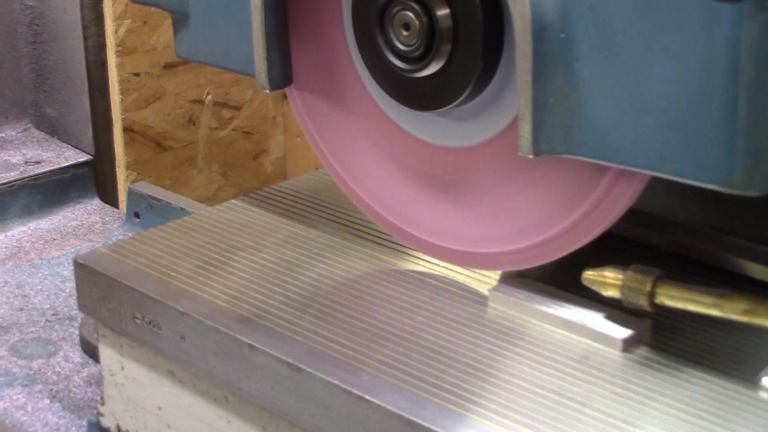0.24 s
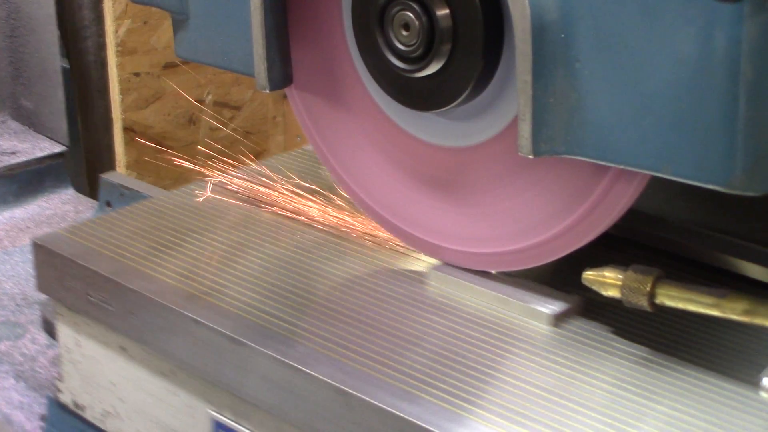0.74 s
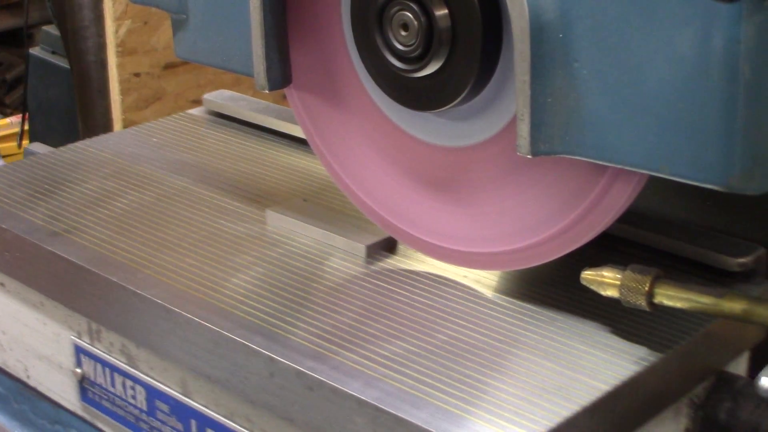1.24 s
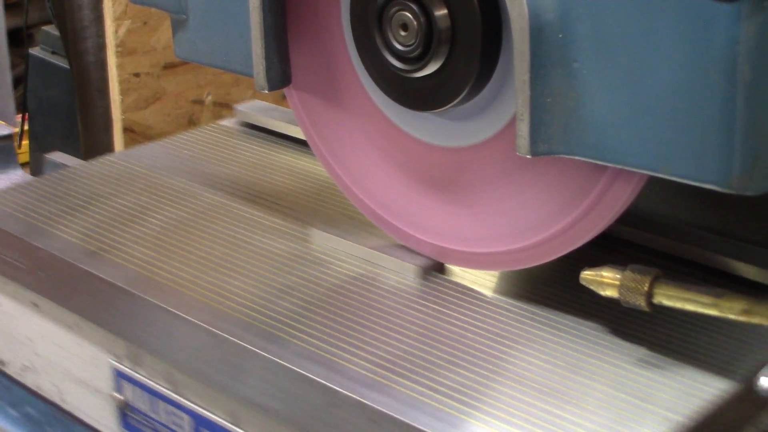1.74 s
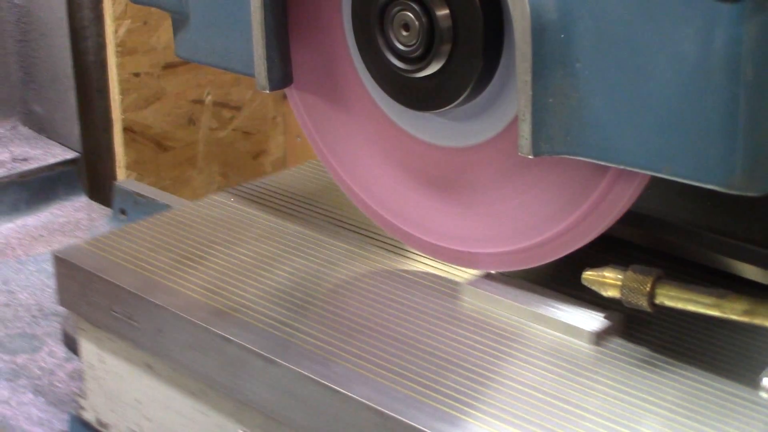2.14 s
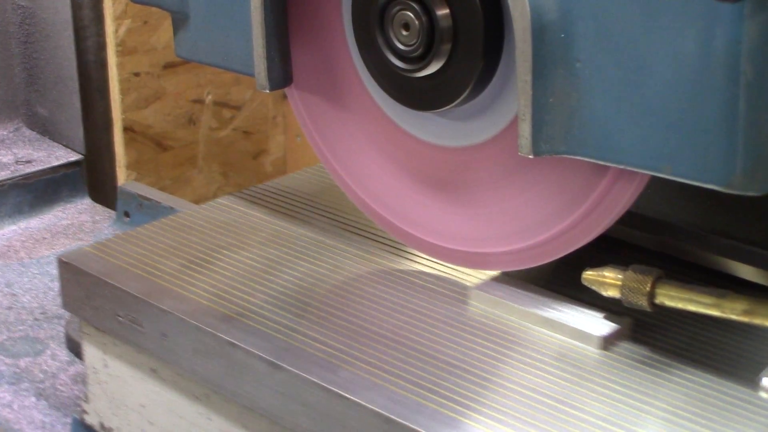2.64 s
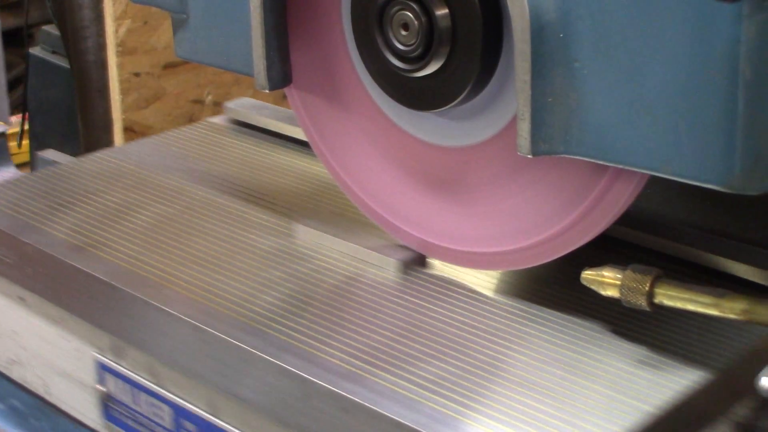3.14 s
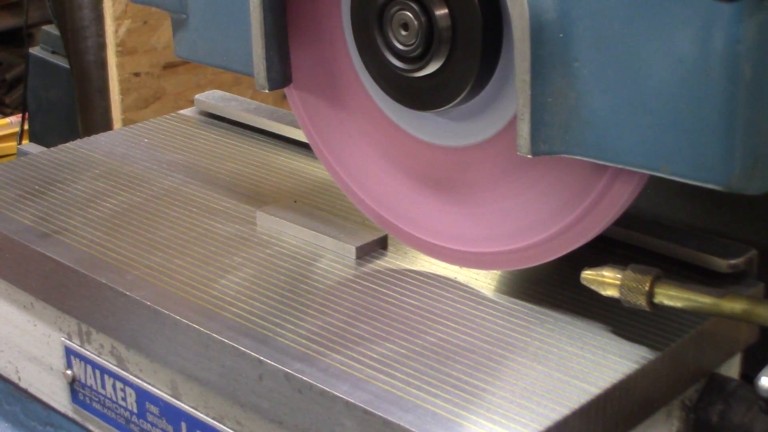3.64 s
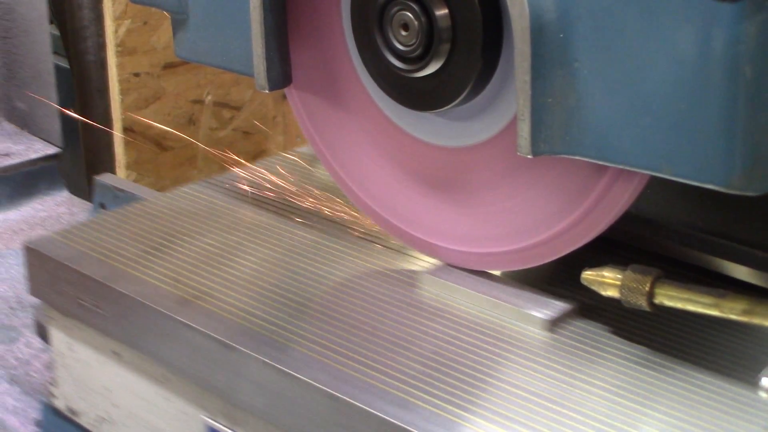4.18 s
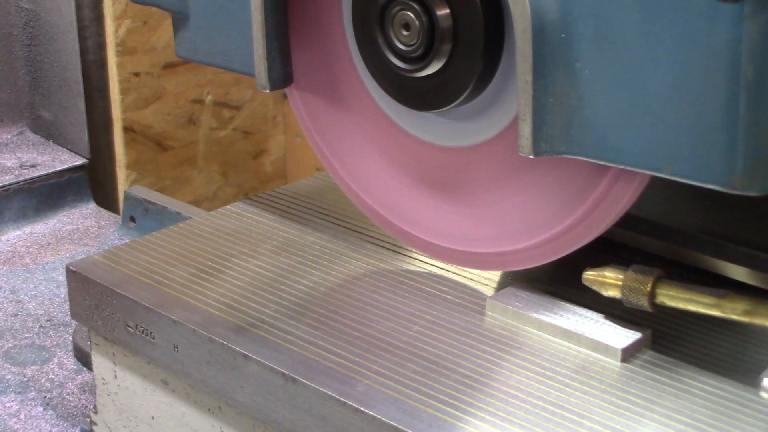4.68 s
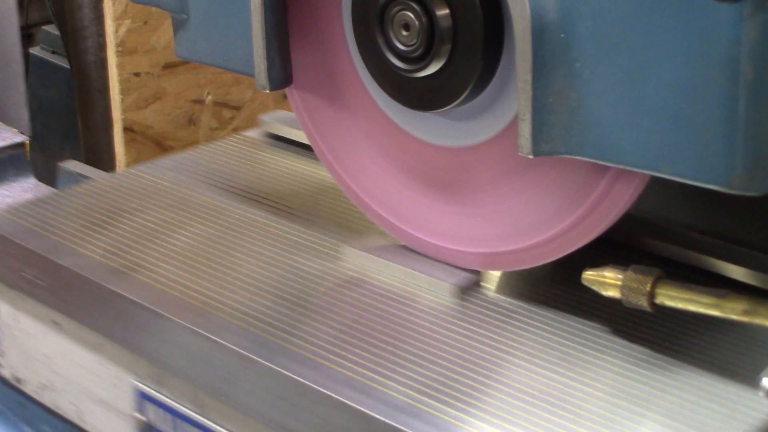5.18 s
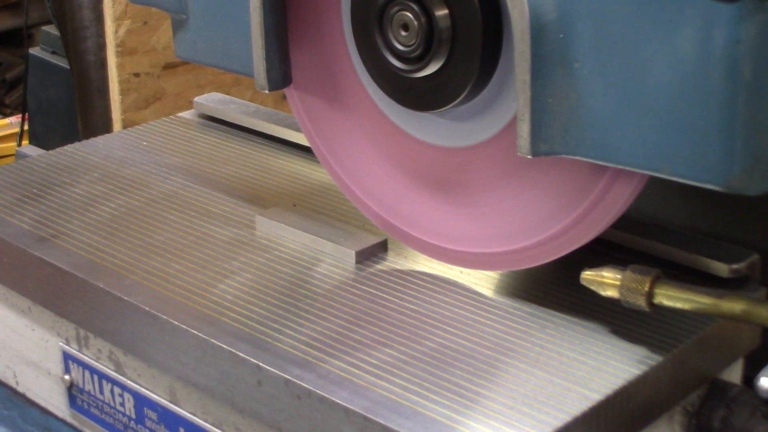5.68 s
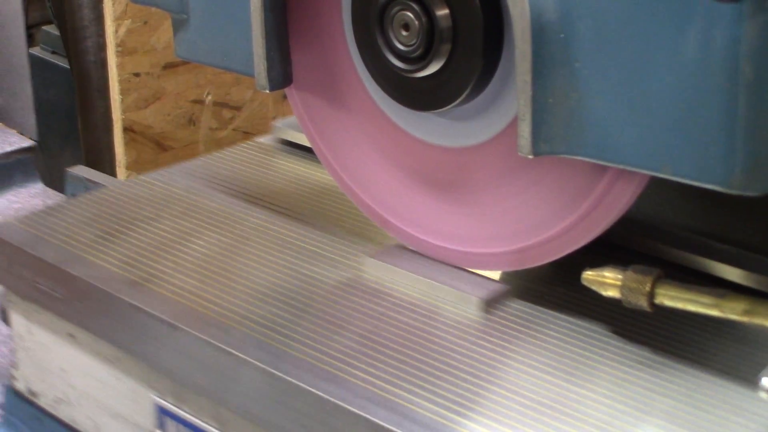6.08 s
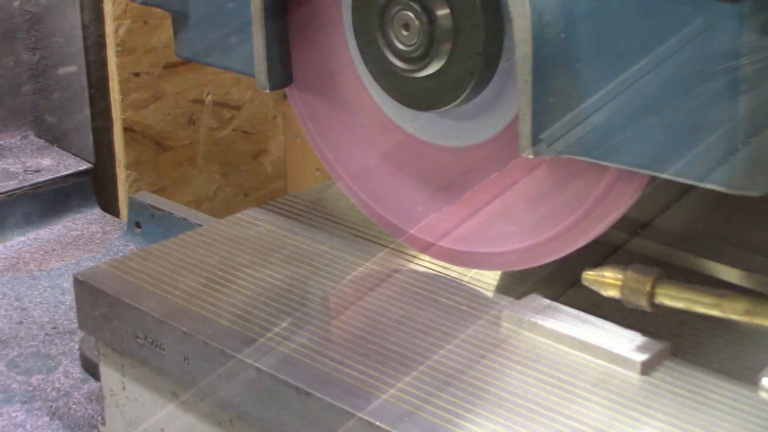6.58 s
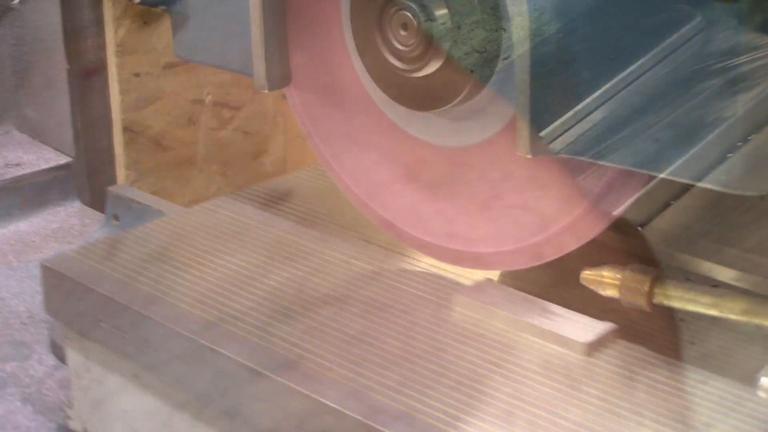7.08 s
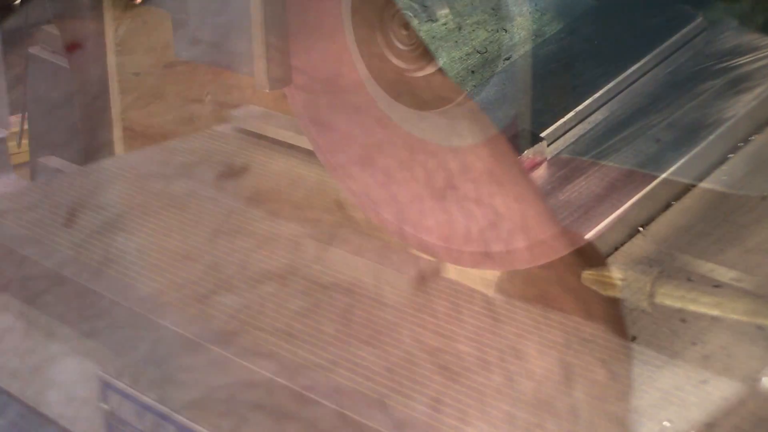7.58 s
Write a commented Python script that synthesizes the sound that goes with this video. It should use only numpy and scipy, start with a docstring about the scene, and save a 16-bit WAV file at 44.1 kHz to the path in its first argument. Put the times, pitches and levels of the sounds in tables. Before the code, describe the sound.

Close by a running grinding machine: constant buzzing mid-pitched whine over rushing air, short scratchy metallic zings on early passes growing fainter, sinking away at the end.

```python
"""In a machine shop, close by a surface grinder. Its drive whines near 408 Hz in a long harmonic series, each
harmonic a comb of sidebands spaced by the turn rate. The table slides to and fro, and interference with its
moving reflections makes the lines swell and cancel. Tones, hum, rushing air and a rumble lie underneath.
On each pass shaped noise hisses briefly as grit meets steel and the wheel's damped modes ring, mostly
weaker in the later passes as it sparks out. Everything sinks in level at the end."""
import sys
import numpy as np
from scipy import signal
from scipy.fft import rfft, irfft, next_fast_len
from scipy.io import wavfile
from scipy.ndimage import uniform_filter1d

SR = 44100
rng = np.random.default_rng(int(sys.argv[2]) if len(sys.argv) > 2 else 0)


def store_pcm(level_fs):
    """Save levels as 16-bit WAV."""
    pcm = np.round(np.clip(level_fs, -1, 1) * 32767).astype(np.int16)
    wavfile.write(sys.argv[1], SR, np.atleast_2d(pcm).T)


N = 344848
HOP = 16  # samples per step of the slow time grid
T = np.arange(N) / SR  # s
SLOW = np.arange(N // HOP + 2) * HOP / SR  # s
WHINE_HZ, TURN_HZ = 407.78, 25.8
SOUND_SPEED = 343  # m/s


def undb(db):
    """Logarithmic level: decibels to amplitude gain."""
    return 10 ** (np.asarray(db) / 20)


def unit(x):
    """Normalisation to a root-mean-square value of 1."""
    return x / np.sqrt(np.mean(np.abs(x) ** 2))


def curve(rows, t):
    """Linear interpolation between (time_s, value) rows."""
    return np.interp(t, *np.transpose(rows))


def colour(x, points):
    """Linear filtering: a spectrum of (frequency_hz, gain_db) points, joined on a logarithmic frequency axis."""
    size = next_fast_len(N)
    hz, db = np.transpose(points)
    f = np.maximum(np.arange(size // 2 + 1) * SR / size, 1)
    gain = undb(np.interp(np.log(f), np.log(hz), db))
    return irfft(rfft(x, size) * gain, size)[:N]


def walk(rate):
    """Low-pass random fluctuation: about `rate` fresh values a second, smoothed, with a spread near 1."""
    k = max(int(SR / HOP / rate), 1)
    held = rng.standard_normal(len(SLOW))[np.arange(len(SLOW)) // k]
    return 1.3 * uniform_filter1d(uniform_filter1d(held, k), k)


def rows_of(table, k, j):
    """Selection: the rows that belong to sideband j of harmonic k, without those two columns."""
    return [row[2:] for row in table if (round(row[0]), round(row[1])) == (k, j)]


# turning points of the table: time_s, position_m
TURNING_POINTS = [(-.6, 0.00048), (.38, 0.1503), (1.4, 0), (2.42, 0.1583), (3.5, 0.00023), (4.62, 0.1425),
                  (5.62, 0.0056), (6.65, 0.1437), (7.85, 0.001)]


def table_position():
    """Reciprocating motion: a half cosine eases the table from each turning point to the next (m)."""
    s, metres = np.transpose(TURNING_POINTS)
    stroke = np.interp(SLOW, s, np.arange(len(s)))
    eased = np.floor(stroke) + (1 - np.cos(np.pi * (stroke % 1))) / 2
    return np.interp(eased, np.arange(len(s)), metres)


def reflections(hz, position, share, count=3):
    """Multipath interference: the direct path plus echoes whose paths change by up to about twice the travel."""
    slope = rng.uniform(-1.98, 2.052, (count, 1))  # m of path per m of travel
    start = rng.random((count, 1))  # cycles
    turns = (hz * slope * position / SOUND_SPEED + start).astype(np.float32)
    echoes = np.cos(2 * np.pi * turns).sum(0) + 1j * np.sin(2 * np.pi * turns).sum(0)
    return unit(1 + share * echoes)


# lines with timed swells and dips: harmonic, sideband, start_swell_db, trend_db_per_s
TIMED_LINES = [(2, 0, 3, 0.01), (4, 0, 8.5, -1.32), (6, 1, 10, -0.49), (7, -1, 4.5, 0.04),
               (7, 1, 0.3, 0.83), (8, -1, -4.5, 0), (8, 1, -3.5, 0), (9, 1, -2, 0), (10, -1, -2, 0),
               (10, 1, -1.5, 0)]
# a node (-) or crest (+) of such a line's standing wave sweeps over the microphone:
# harmonic, sideband, time_s, half_width_s (to 1/e), depth_db
NODES_AND_CRESTS = [(2, 0, 2.63, 0.51, -12.5), (2, 0, 4.44, 0.94, -6.5), (2, 0, 6.55, 0.42, -7.5),
                    (4, 0, 0.088, .58, -4.5), (4, 0, 0.83, .18, -18), (4, 0, 1.903, 0.11, -20),
                    (4, 0, 2.06, 0.51, -9), (4, 0, 2.89, .23, -13.5), (4, 0, 3.81, 0.22, -10),
                    (4, 0, 4.496, 0.18, -11.5), (4, 0, 4.78, .15, -20), (4, 0, 5.92, 0.13, 3.5),
                    (4, 0, 6.78, 0.17, 1.5), (4, 0, 7.56, 0.38, -10), (6, 1, 0.12, 0.41, -14),
                    (6, 1, 1.37, 0.64, -18), (6, 1, 1.83, 0.37, -25), (6, 1, 2.34, .15, 2),
                    (6, 1, 2.85, 0.23, 3.5), (6, 1, 3.1, .12, -7), (6, 1, 3.61, 0.94, -23.5),
                    (6, 1, 5.45, 1, -19), (6, 1, 7.43, .99, -16), (7, -1, 0.76, 0.49, -18),
                    (7, -1, 1.4, 0.16, 2.5), (7, -1, 2.48, 0.79, -12), (7, -1, 3.03, 0.11, 8),
                    (7, -1, 3.48, 0.79, -15), (7, -1, 4.36, 0.081, -27), (7, -1, 4.79, 0.14, 3),
                    (7, -1, 5.65, .62, -9.5), (7, -1, 6.18, 0.077, 3.5), (7, -1, 7.2, 0.1, -20),
                    (7, 1, .02, 0.2, 6), (7, 1, 1.1, 0.21, -15), (7, 1, 1.4, 0.16, 2), (7, 1, 2.2, .6, -2),
                    (7, 1, 3.57, .2, -19), (7, 1, 4.14, .17, -16), (7, 1, 5.74, 0.69, -14),
                    (7, 1, 7.75, 0.71, -8), (8, -1, 0.72, 0.097, 13), (8, -1, 2.56, .24, 12),
                    (8, -1, 4.7, 0.26, 8), (8, -1, 6.5, 0.075, 11), (8, -1, 7.05, 0.09, 10),
                    (8, 1, 0.94, .17, 8), (8, 1, 1.75, 0.17, 8.5), (8, 1, 2.95, 0.23, 9.5),
                    (8, 1, 5.13, 0.16, 13), (8, 1, 7, 0.23, 1), (9, 1, 3.46, .2, 10.5),
                    (9, 1, 5.55, .25, 7), (9, 1, 6.95, .16, 8.5), (10, -1, 3.72, .14, 11.5),
                    (10, 1, .7, .28, 10)]
# these lines, unless their swells are timed above, meet an echo off the sliding table and another
# whose path just creeps: harmonic, sideband, table_share (gain), table_path_m,
# lever (m path per m travel), table_creep_m_per_s, other_share (gain), other_path_m, other_creep_m_per_s
LINE_ECHOES = [(2, -1, 1.0, .004, -0.38, -0.125, 0.98, 0.4, 0.101),
               (2, 1, 0.45, 0.044, -0.94, -0.163, 0.54, 0.063, 0.082),
               (2, 2, 0.56, 0.041, -0.15, -0.161, 0.95, 0.28, 0.1245),
               (3, 0, 0.43, 0.28, 0.47, 0.0642, 0.43, 0.06, 0.094),
               (5, -1, 0.35, 0.037, -0.0025, -0.115, 0.64, 0.094, .03),
               (5, 0, 0.73, 0.11, -0.34, 0.1115, 0.76, 0.036, 0.148),
               (5, 1, 0.53, 0.1, -1.1, -.005, 0.44, 0.077, .09),
               (6, -1, 1, 0.13, -0.46, -0.037, 1.0, 0.131, 0.0433),
               (8, -1, 1.0, 0.057, -0.14, .001, 0.98, 0.071, 0.051),
               (8, 1, 1, 0.049, -0.145, .0544, 0.97, 0.033, 0.0356)]
# part of the weak scattered echoes that still stirs each kind of line (0-1)
ECHO_SCATTER, TIMED_SCATTER = 0.25, 0.14


def standing_wave(k, j, position):
    """Standing-wave interference: swell of sideband j of harmonic k, and the share of weak echoes it keeps."""
    for start_db, trend in rows_of(TIMED_LINES, k, j):
        gain = undb(start_db + trend * SLOW)
        for s, width_s, depth_db in rows_of(NODES_AND_CRESTS, k, j):
            bell = np.exp(-((SLOW - s) / width_s) ** 2)
            gain = gain * (1 - (1 - undb(depth_db)) * bell)
        return gain, TIMED_SCATTER
    wavelength = SOUND_SPEED / (k * WHINE_HZ + j * TURN_HZ)

    def echo(metres):
        """Phase shift: one cycle for each wavelength of extra path."""
        return np.exp(2j * np.pi * metres / wavelength)

    for share, path, lever, creep, share2, path2, creep2 in rows_of(LINE_ECHOES, k, j):
        off_table = share * echo(path + lever * position + creep * SLOW)
        off_other = share2 * echo(path2 + creep2 * SLOW)
        return unit(np.abs(1 + off_table + off_other)), ECHO_SCATTER
    return 1, 1


# wobble of the second harmonic: time_s, pitch_share (0 = all in level, 1 = all in pitch)
PITCH_WOBBLE = [(0, 0.87), (2.2, 0.87), (3.0, 0.72), (3.7, 0.29), (4.4, 0.68), (5.2, 0.75), (6.6, 0.79),
                (7.8, 0.76)]


def overtone(k, levels_db, position, share, skirt_db, count):
    """Periodic modulation: a wobble once a turn gives harmonic k a comb of sidebands, dying away outwards."""
    skirt = skirt_db * np.sqrt(np.arange(1, count + 1))
    levels_db = np.concatenate([levels_db[0] + skirt[::-1], levels_db, levels_db[-1] + skirt])
    in_pitch = np.clip(curve(PITCH_WOBBLE, SLOW), 0, 1)
    out = 0
    for j, db in enumerate(levels_db, -(len(levels_db) // 2)):
        swell, freedom = standing_wave(k, j, position)
        gain = swell * reflections(k * WHINE_HZ, position, share * freedom)
        # sidebands in step throb in level; a quarter cycle ahead they wobble the pitch
        ahead = np.pi / 2 * abs(j) * in_pitch if k == 2 else 2 * np.pi * rng.random()
        out = out + undb(db) * gain * np.exp(1j * (ahead + 2 * np.pi * j * TURN_HZ * SLOW))
    return out


# low overtones, line levels before their swells: harmonic, then level_db at
# -3, -2, -1, 0, +1, +2, +3 turn rates from the harmonic
LOW_HARMONICS = [(1, -53, -54, -63, -54, -48, -42, -49), (2, -46, -37, -30, -20, -29, -32, -43),
                 (3, -52, -38, -39, -26, -44, -43, -44), (4, -40, -35, -39, -17, -36, -37, -43),
                 (5, -45, -43, -32, -34, -31, -53, -48), (6, -47, -51, -31, -46, -23, -52, -46),
                 (7, -43, -49, -24, -40, -26, -46, -34), (8, -52, -47, -34, -44, -31, -43, -40),
                 (9, -50, -50, -40, -45, -37, -48, -44)]
# high overtones, levels before swells and the gains in whine(): harmonic, centre_db, first_pair_db, outer_db
HIGH_HARMONICS = [(10, -49, -44, -53), (11, -47, -49, -53), (12, -52, -45, -50), (13, -54, -51, -55),
                  (14, -54, -48, -53), (15, -48, -40, -52), (16, -50, -37, -53), (17, -50, -45, -56),
                  (18, -48, -46, -54), (19, -58, -53, -58), (20, -56, -55, -58), (21, -61, -54, -63),
                  (22, -58, -54, -63), (23, -53, -46, -55), (24, -57, -53, -52), (25, -63, -50, -59),
                  (26, -64, -58, -60), (27, -68, -60, -66), (28, -69, -67, -68), (29, -70, -66, -65),
                  (30, -72, -65, -68), (31, -76, -66, -67), (32, -67, -64, -68), (33, -71, -66, -68),
                  (34, -69, -65, -64)]
# gain of the shrill harmonics 15 to 18: time_s, gain_db
SHRILL_GAIN = [(0, -7), (.6, 2.5), (1.5, -2), (2.55, 4), (3.65, -1.5), (4.05, 4), (4.4, 0), (4.75, 5),
               (5.3, 5), (5.8, -0.5), (6.9, -3.5), (7.8, 3.5)]


def whine(position, wander_hz=0.09, flutter_hz=0.11, high_db=1.0, top_db=0.0):
    """Harmonic series: all overtones are powers of one rotating phasor, so they share its wandering speed."""
    envelopes = []
    for k, *db in LOW_HARMONICS:
        envelopes.append(overtone(round(k), np.array(db), position, share=0.49, skirt_db=-12.0, count=5))
    for k, centre, pair, outer in HIGH_HARMONICS:
        comb = np.array([outer, outer, pair, centre, pair, outer, outer])
        if 15 <= k <= 18:
            gain_db = curve(SHRILL_GAIN, SLOW)
        else:
            gain_db = high_db if k <= 26 else top_db
        lines = overtone(round(k), comb, position, share=0.99, skirt_db=-8, count=3)
        envelopes.append(undb(gain_db) * lines)
    drift = np.cumsum(wander_hz * walk(1.5) + flutter_hz * walk(25)) * HOP / SR  # cycles
    rotor = np.exp(2j * np.pi * (WHINE_HZ * T + np.interp(T, SLOW, drift)))
    carrier, out = 1, 0
    for envelope in envelopes:
        carrier = carrier * rotor  # next harmonic
        out = out + (np.interp(T, SLOW, envelope) * carrier).real
    return np.sqrt(2) * out


# mains hum and motor tones: pitch_hz, level_db (rms, about which each wavers)
HUM_AND_TONES = [(59.9, -67.5), (120.0, -70), (419.2, -31), (459.5, -53.5), (721.7, -37), (1317.7, -37.5),
                 (1377.2, -55), (1940.2, -31), (2117.3, -60), (2352.6, -56), (2540.7, -47), (2592.2, -42),
                 (2676.7, -46), (3497.9, -66), (5910.6, -45.5)]


def motor(waver_db=0.9, wander=0.000325):
    """Sinusoidal radiation: hum and motor tones, each with a small random waver of level and pitch."""
    out = 0
    for hz, db in HUM_AND_TONES:
        clock = T + np.interp(T, SLOW, np.cumsum(wander * walk(3.99)) * HOP / SR)
        size = np.interp(T, SLOW, undb(db + waver_db * walk(9)))
        out = out + size * np.sin(2 * np.pi * (hz * clock + rng.random()))
    return np.sqrt(2) * out


# air dragged round by the wheel, and bearings, before the gain in air(): frequency_hz, density_db (per Hz)
AIR_SPECTRUM = [(25, -85), (80, -92.5), (180, -67.5), (380, -65), (720, -55.5), (1100, -62), (2500, -62),
                (3100, -65), (5200, -73.5), (6300, -66.5), (7900, -75), (9800, -74.5), (11500, -84),
                (15000, -90)]


def air(gain_db=1.0, throb=0.12, flicker_db=0.8):
    """Amplitude-modulated broadband noise: the rush of air and bearings pulses twice a turn and flickers."""
    rush = colour(rng.standard_normal(N), AIR_SPECTRUM) * np.sqrt(SR / 2)
    pulse = 1 + throb * np.cos(2 * np.pi * 2 * TURN_HZ * T)
    flicker = np.interp(T, SLOW, undb(gain_db + flicker_db * walk(7.5)))
    return rush * pulse * flicker


# rumble of the table on its ways, shape only: frequency_hz, relative_db
RUMBLE_SPECTRUM = [(60, -35), (170, -16.5), (230, -9), (280, 4), (310, -4), (390, -12), (520, 0),
                   (650, -10.5), (710, 10.5), (800, 4), (1100, -8), (3000, -5.5), (9000, -43)]


def slideways(position, gain_db=-33):
    """Sliding friction: noise of the table on its ways, its amplitude proportional to the table's speed."""
    speed = np.abs(np.gradient(position))
    rumble = colour(rng.standard_normal(N), RUMBLE_SPECTRUM) * np.interp(T, SLOW, speed)
    return undb(gain_db) * unit(rumble)


# wheel on steel: start_s, end_s (nominal; contact eases off around it), bite_s (time to full depth),
# hiss_db, ring_db (drive of the wheel modes)
WHEEL_PASSES = [(0.007, 0.081, 0.045, -21, -23.5), (0.82, 0.883, .004, -22, -27.5),
                (1.12, 1.15, .01, -41, -48), (1.81, 1.85, .01, -40, -49), (2.08, 2.132, 0.031, -19.5, -19),
                (2.895, 2.936, .004, -24, -23.5), (3.18, 3.21, .01, -41, -61),
                (4.203, 4.266, 0.049, -29, -41), (5.082, 5.105, .004, -38, -43),
                (6.275, 6.3, .015, -38, -50)]
# colour of the grit cutting steel, shape only: frequency_hz, relative_db
GRIT_SPECTRUM = [(1000, -37), (3000, 5), (4700, -10), (6000, -1), (7900, -2), (10400, 4.5), (11200, -10),
                 (12600, -1), (13700, 0), (14600, -10), (15600, -3.5)]
# ring of the wheel: pitch_hz, relative_db, t60_s
RING_MODES = [(3540, 1, .24), (5925, -7, .08), (6407, -2, .14), (8753, -9, .12), (10330, -14, .05),
              (11885, -14, .12), (13800, -17, .05), (15230, -23, .07)]


def grinding(grain_db=4, leave_s=0.013, idle_db=-48, release_db=23):
    """Forced and free vibration: grains chip the steel in contact; the wheel springs free and rings on."""
    grain_sizes = np.repeat(rng.standard_normal(N // HOP + 1), HOP)[:N]
    grains = unit(rng.standard_normal(N) * undb(grain_db * grain_sizes))
    cut, push, release = np.zeros(N), np.zeros(N), np.zeros(N)
    for start, end, bite_s, hiss, ring in WHEEL_PASSES:
        contact = np.clip(np.minimum((T - start) / bite_s, (end - T) / leave_s + 0.45), 0, 1)
        cut += undb(hiss) * contact
        push += undb(ring) * contact
        release[int((end - leave_s) * SR)] += undb(ring + release_db)  # kick of springing free
    out = cut * unit(colour(grains, GRIT_SPECTRUM))
    for hz, db, t60 in RING_MODES:
        pole = np.exp((2j * np.pi * hz - np.log(1000) / t60) / SR)
        # the turning spindle and springing free mostly stir the lowest mode
        softness = (RING_MODES[0][0] / hz) ** 2
        drive = push * grains + softness * (release + undb(idle_db) * grains)
        ringing = signal.lfilter([1], [1, -pole], drive).imag
        out = out + undb(db) * np.sqrt(2 * (1 - abs(pole) ** 2)) * ringing
    return out


# stereo width of the phase-turned part: frequency_hz, side_minus_mid_db
STEREO_WIDTH = [(60, -45), (250, -27), (800, -20.5), (1800, -24.5), (2450, -8), (2850, -15), (5000, -16.5),
                (9000, -17), (12000, -30)]


def stereo(mid, echo_s=0.027, shop_db=-29, balance_db=-0.35):
    """Interchannel phase: a quarter-cycle side signal parts two microphone ports, with a faint shop echo."""
    decay = np.exp(-T[:SR // 2] / echo_s)
    shop = signal.fftconvolve(mid, rng.standard_normal(SR // 2) * decay)[:N]
    turned = signal.hilbert(mid, next_fast_len(N))[:N].imag
    side = colour(turned, STEREO_WIDTH) + undb(shop_db) * np.std(mid) * unit(shop)
    return np.array([mid + side, mid - side]) * undb([[balance_db / 2], [-balance_db / 2]])


def scene():
    """Superposition: the running machine and its passes over the part add up."""
    position = table_position()
    return stereo(whine(position) + motor() + air() + slideways(position) + grinding())


# overall level with the closing fade: time_s, gain_db
CLOSING_FADE = [(0, -1), (6.3, 0), (7, -3), (7.5, -6.5), (7.82, -12)]


def record(dry, ceiling=0.92, top_hz=15250):
    """Saturation and band limiting: the highest peaks are rounded, the end fades and the top is cut."""
    rounded = dry / (1 + (dry / ceiling) ** 12) ** (1 / 12)
    low_pass = signal.ellip(10, .1, 80, top_hz, fs=SR, output="sos")
    return signal.sosfilt(low_pass, rounded * undb(curve(CLOSING_FADE, T)))


dry = scene()
out = record(dry)
store_pcm(out)
```